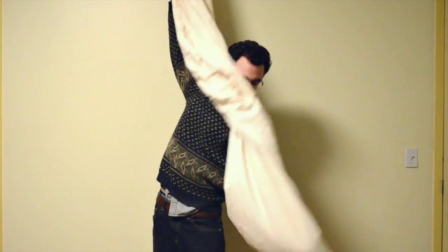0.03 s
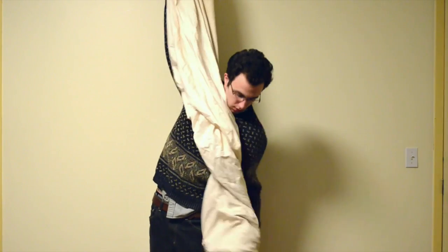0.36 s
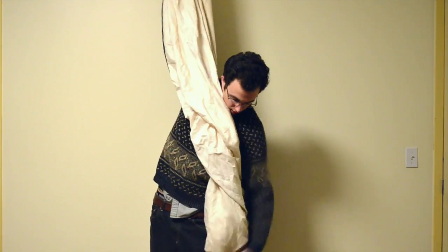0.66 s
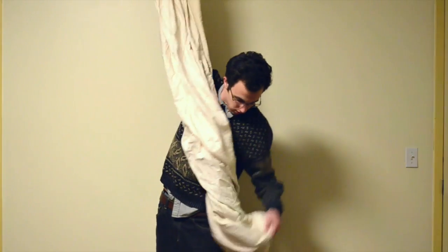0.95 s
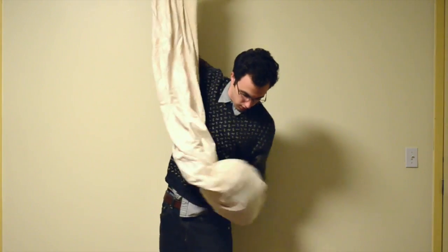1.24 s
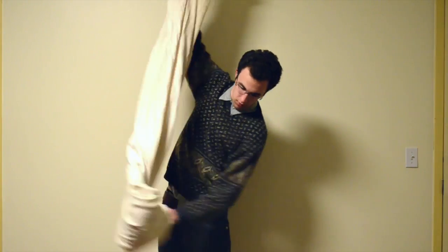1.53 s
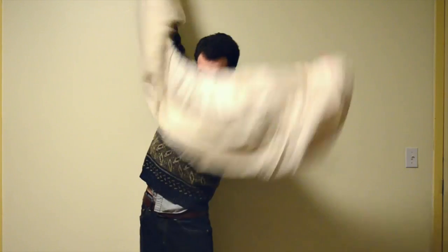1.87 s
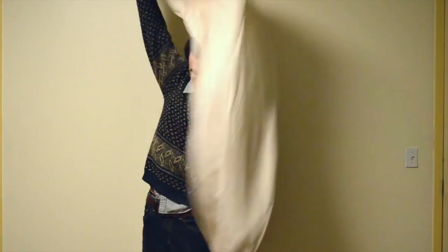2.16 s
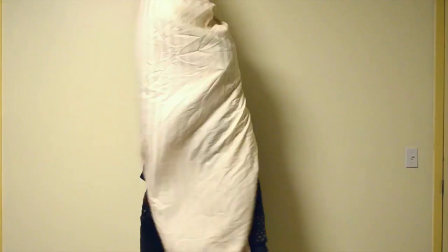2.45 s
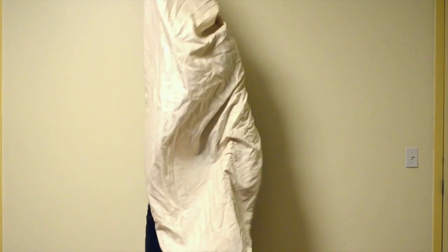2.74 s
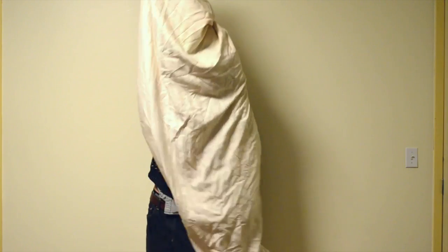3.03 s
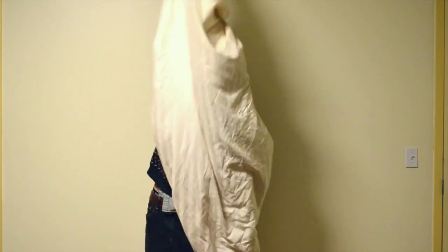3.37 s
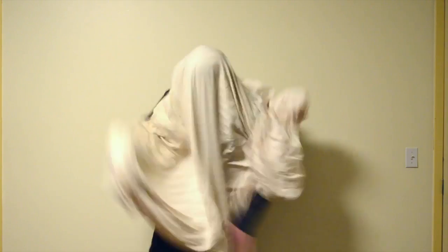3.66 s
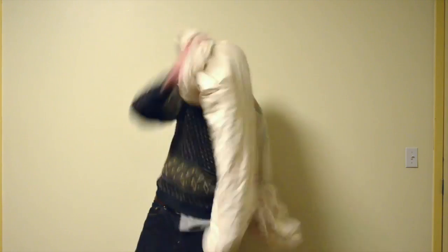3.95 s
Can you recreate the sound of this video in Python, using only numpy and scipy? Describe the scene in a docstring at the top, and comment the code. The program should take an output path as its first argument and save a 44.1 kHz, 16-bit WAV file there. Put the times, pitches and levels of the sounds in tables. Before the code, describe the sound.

Fabric flapping with soft whooshes and dull snaps over a faint electrical hum.

```python
"""A large cloth sheet is gathered, swung overhead and flapped hard in a small, quiet room.
First the weave slides and small folds flutter faintly, with a few soft pops. From 1.7 s the sheet
swings: folds snap taut with dull pops and it pushes air. After a lull it flaps hard: a sharp, dry
digital click at 3.52 s, then two crisp cracks as the hardest fold snaps. Another flap starts near 4 s.
Throughout, bare walls answer each flap over room noise and a low electrical hum."""
import sys
import numpy as np
from scipy import signal
from scipy.fft import rfft, irfft
from scipy.io import wavfile
from scipy.ndimage import uniform_filter1d

SR = 44100
rng = np.random.default_rng(int(sys.argv[2]) if len(sys.argv) > 2 else 0)


def unload_wav(signal):
    """Save mono or channel-first audio to the path in sys.argv[1] as 16-bit WAV at rate SR, clipped to [-1, 1]."""
    wavfile.write(
        sys.argv[1],
        SR,
        np.round(np.clip(np.atleast_2d(signal).T, -1, 1) * 32767).astype(np.int16),
    )


N = 176400


def amp(db):
    """Decibels to gain."""
    return 10 ** (np.asarray(db) / 20)


def read(points, hz):
    """Interpolates a table on a log-frequency axis."""
    f, value = np.transpose(points)
    return np.interp(np.log(hz + 1), np.log(f), value)


def level(points):
    """Gain over time from a level curve."""
    return amp(np.interp(np.arange(N) / SR, *np.transpose(points)))


def add(mix, start_s, sound):
    """Mixes a sound in at a time."""
    part = mix[round(start_s * SR):][:len(sound)]
    part += sound[:len(part)]


def pulse(spectrum, size=4096):
    """Minimum-phase pulse with this spectrum, energy 1."""
    hz = abs(np.fft.fftfreq(size, 1 / SR))
    log_gain = np.log(amp(read(spectrum, hz)))
    response = np.exp(np.conj(signal.hilbert(log_gain)))
    impulse = np.fft.ifft(response).real
    return impulse / np.linalg.norm(impulse)


def colour(x, spectrum):
    """Gives a steady excitation a spectrum, rms 1."""
    shaped = irfft(rfft(x, N) * rfft(pulse(spectrum), N), N)
    return shaped / np.sqrt(np.mean(shaped ** 2) + 1e-20)


def clicks(per_s, spread_db, window=2048):
    """Random clicks of uneven size and even overall power."""
    train = (rng.random(N) < per_s / SR) * rng.choice([-1, 1], N)
    train = train * amp(spread_db * np.minimum(rng.exponential(1, N), 4))
    power = abs(uniform_filter1d(train ** 2, window))
    return train / np.sqrt(power + 1e-9)


# pop spectrum: f/pitch, level/dB
POP_SPECTRUM = [(.06, -40.5), (.25, -9.5), (.6, -1.5), (1, -2.5), (1.5, -6), (2.3, -19), (4, -27.5),
                (8, -54), (20, -74)]
# scuff spectrum: f/Hz, level/dB
SCUFF_SPECTRUM = [(100, -48), (700, -25), (1500, 22), (2400, 9.5), (3300, 6.5), (5500, -18), (8000, -31),
                  (13000, -34), (16000, -47)]
# folds snapping taut: t/s, pop level/dB, pitch/Hz, scuff level/dB
FOLD_SNAPS = [(.712, -36, 416, -66), (.727, -35.5, 440, -63), (0.772, -46, 470, -70),
              (1.684, -41, 453, -57), (1.695, -32, 840, -56), (1.713, -30.5, 790, -41.5),
              (1.826, -24.5, 475, -52), (1.915, -35, 387, -59), (2.084, -20.5, 614, -28),
              (2.243, -18.5, 510, -56), (2.394, -19.5, 760, -32), (2.837, -38, 700, -46.5),
              (3.179, -40.5, 494, -64), (3.209, -43, 494, -66), (3.373, -37, 535, -73),
              (3.387, -40, 626, -60), (3.46, -29, 520, -53), (3.463, -39, 620, -47), (3.508, -16, 800, -52),
              (3.524, -22, 760, -33), (3.552, -9, 760, -25.5), (3.573, -24, 630, -42),
              (3.602, -16.5, 510, -30), (3.682, -14.5, 664, -26), (3.74, -22.5, 500, -42),
              (3.759, -15.5, 736, -52), (3.972, -22.5, 710, -54)]


def snaps():
    """A large fold tightens: one round pressure pulse, small creases after it, a scuff of the weave."""
    crumple_s, crumple_db = 0.0086, -22
    echo_s, echo_db = 0.00301, -9  # nearest wall
    scuff_s = 0.0044
    out, t = np.zeros(N), np.arange(SR // 20) / SR
    for start_s, pop_db, pitch_hz, scuff_db in FOLD_SNAPS:
        creases, threads = rng.standard_normal((2, len(t)))
        drive = amp(crumple_db) * creases * np.exp(-t / crumple_s)
        drive[0] = 1  # the snap itself
        pop = pulse([(pitch_hz * ratio, db) for ratio, db in POP_SPECTRUM])
        pop /= abs(pop).max()
        scrape = threads * t / scuff_s * np.exp(-t / scuff_s)
        add(out, start_s, amp(pop_db) * signal.fftconvolve(drive, pop))
        add(out, start_s + echo_s, amp(pop_db + echo_db) * pop)
        add(out, start_s, amp(scuff_db) * signal.fftconvolve(scrape, pulse(SCUFF_SPECTRUM)))
    return room(out, wet_db=-0.5)


# small-fold spectrum: f/Hz, level/dB
FOLD_SPECTRUM = [(30, -55), (70, -9.5), (130, -5.5), (220, -17), (290, -0.5), (360, -5.5), (480, 1),
                 (650, -2), (850, -6), (1100, -6.5), (1500, -16.5), (1900, -25), (2400, -28), (3600, -43),
                 (5500, -58), (10000, -79.5), (16000, -66)]
# flutter envelope: t/s, level/dB
FLUTTER_LEVEL = [(0, -57.5), (.2, -62.5), (.5, -58), (.69, -69), (.73, -49), (.8, -55.5), (.9, -61),
                 (1.675, -59), (1.715, -35), (1.78, -34.5), (1.85, -37), (1.9, -45), (2.0, -49.5),
                 (2.08, -31), (2.19, -31.5), (2.27, -30.5), (2.34, -35.5), (2.42, -30.5), (2.5, -41),
                 (2.58, -58.5), (2.76, -55.5), (3.1, -64), (3.38, -52.5), (3.5, -63), (3.525, -24),
                 (3.6, -26), (3.65, -29), (3.72, -24), (3.77, -22), (3.83, -29.5), (3.88, -39.5),
                 (3.96, -40.5), (3.99, -28)]


def flutter():
    """Many small folds flip over while the sheet moves."""
    folds = colour(clicks(per_s=1300, spread_db=3), FOLD_SPECTRUM)
    return room(level(FLUTTER_LEVEL) * folds, wet_db=-4.5)


# sliding-weave spectrum: f/Hz, level/dB
WEAVE_SPECTRUM = [(60, -15), (300, -6), (1000, 7), (1900, -4.5), (2900, -8.5), (4000, -17), (5500, -25),
                  (8000, -29), (12500, -33.5), (14500, -38.5), (16000, -55)]
# slide envelope: t/s, level/dB
SLIDE_LEVEL = [(0, -55.5), (.12, -54), (.2, -64), (.5, -60), (.66, -67), (.74, -56), (.9, -68.5),
               (1.07, -58.5), (1.2, -70), (1.52, -57), (1.67, -67), (1.76, -45.5), (1.85, -45.5),
               (1.91, -52), (2.02, -50), (2.07, -36.5), (2.15, -42), (2.28, -43.5), (2.45, -54.5),
               (2.75, -76), (2.87, -55), (3.1, -68), (3.3, -61), (3.45, -60.5), (3.505, -46.5), (3.53, -38),
               (3.66, -37), (3.76, -33.5), (3.85, -46), (3.94, -47.5), (4, -41)]


def slide():
    """Cloth slides over cloth: threads catch and let go in a fine hiss."""
    hiss = colour(clicks(per_s=7800, spread_db=2), WEAVE_SPECTRUM)
    return room(level(SLIDE_LEVEL) * hiss, wet_db=-8.5)


# stirred-air spectrum: f/Hz, level/dB
AIR_SPECTRUM = [(25, -42), (50, -38), (75, -14), (105, -6.5), (135, 7.5), (165, 5.5), (230, 1),
                (400, -27.5), (1000, -31), (4000, -85)]
# Gaussian swells of air: t/s, level/dB, half-width/s
AIR_SWELLS = [(1.85, -42.5, 0.076), (2.02, -44, 0.021), (2.14, -46, 0.045), (2.245, -32.5, 0.039),
              (2.4, -38, 0.055), (3.57, -40, 0.054), (3.76, -40, 0.066), (3.99, -34.5, 0.051)]


def billows():
    """The billowing sheet pushes air in low swells."""
    t = np.arange(N) / SR
    swell = sum(amp(db) * np.exp(-.5 * ((t - peak_s) / half_width_s) ** 2)
                for peak_s, db, half_width_s in AIR_SWELLS)
    return swell * colour(rng.standard_normal(N), AIR_SPECTRUM)


# tick spectrum: f/Hz, level/dB
TICK_SPECTRUM = [(200, -23), (2000, 8), (5000, 9), (14000, -1), (16000, -2)]
# ticks: t/s, level/dB
DRY_TICKS = [(3.52, -22), (3.5517, -31), (3.555, -27)]


def ticks():
    """A sharp, dry digital click, then two crisp cracks as the hardest fold snaps."""
    out = np.zeros(N)
    for start_s, db in DRY_TICKS:
        add(out, start_s, amp(db) * pulse(TICK_SPECTRUM))
    return out


# room decay: f/Hz, T60/s
ROOM_T60 = [(100, 0.99), (500, 0.53), (1500, 0.58), (4000, 0.16), (12000, 0.34)]


def room(x, wet_db, gap_s=.003):
    """Direct sound plus dense wall reflections that die sooner in the treble."""
    slot = 20  # samples; one reflection in each
    count = SR // slot
    taps = np.zeros(SR)
    taps[np.arange(count) * slot + rng.integers(0, slot, count)] = rng.choice([-1, 1], count)
    hz, t, bands = signal.stft(taps, SR, nperseg=256)
    decay = amp(-60 * t / read(ROOM_T60, hz)[:, None])
    tail = signal.istft(bands * decay, SR)[1]
    out = x.copy()
    add(out, gap_s, amp(wet_db) * signal.fftconvolve(x, tail / np.linalg.norm(tail)))
    return out


# room-noise spectrum: f/Hz, level/dB
NOISE_SPECTRUM = [(20, -9), (40, -1), (65, 3), (150, 8), (300, -1), (600, -11), (1000, -7), (2000, -14),
                  (3000, -20.5), (5500, -33), (9000, -37.5), (13000, -40), (15000, -58)]


def background():
    """Room noise and a steady electrical hum."""
    noise_db, hum_hz, hum_db = -54.5, 119.4, -50.5
    hum = np.sqrt(2) * np.sin(2 * np.pi * (hum_hz * np.arange(N) / SR + rng.random()))
    noise = colour(rng.standard_normal(N), NOISE_SPECTRUM)
    return amp(noise_db) * noise + amp(hum_db) * hum


def scene():
    """The sheet in the room, mono."""
    return (snaps() + flutter() + slide() + billows() + ticks() + background())[None]


def record(dry):
    """Steep low-pass at the top of the treble."""
    cutoff_hz = 15750
    lowpass = signal.firwin(511, cutoff_hz, window=("kaiser", 9), fs=SR)
    return signal.oaconvolve(dry, lowpass[None], "same")


dry = scene()
out = record(dry)
unload_wav(out)
```